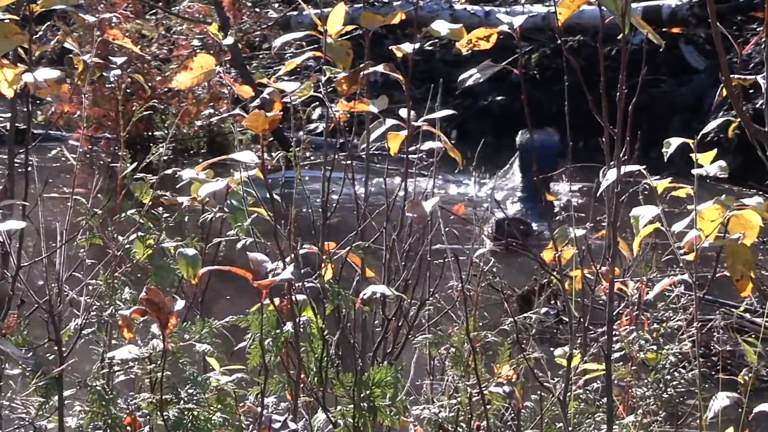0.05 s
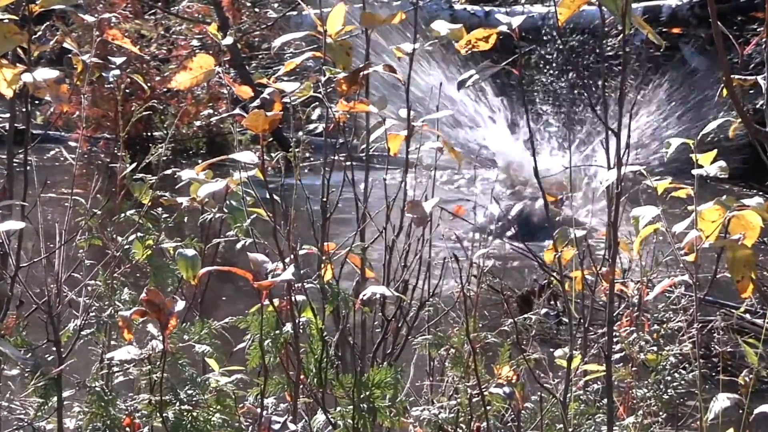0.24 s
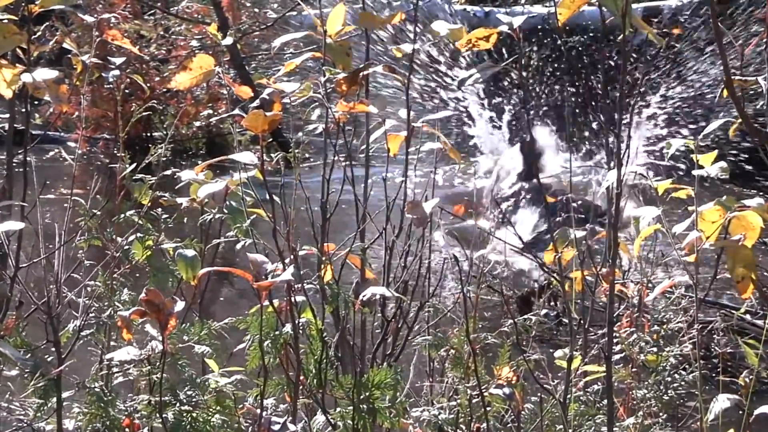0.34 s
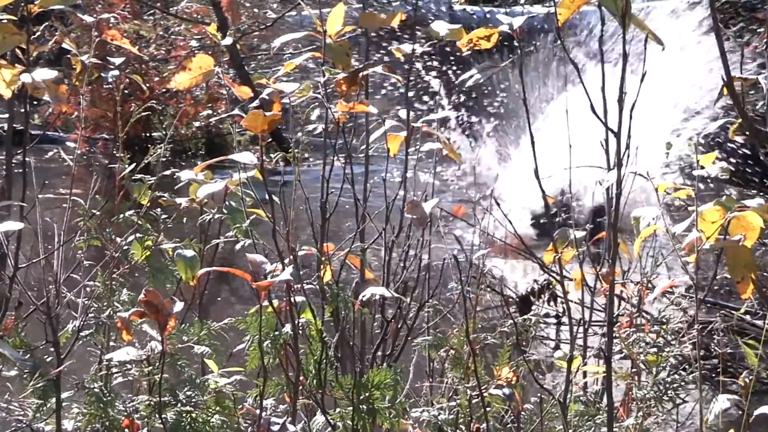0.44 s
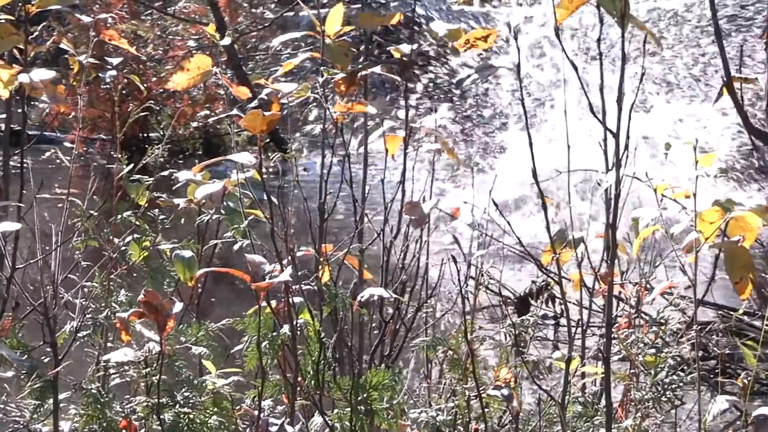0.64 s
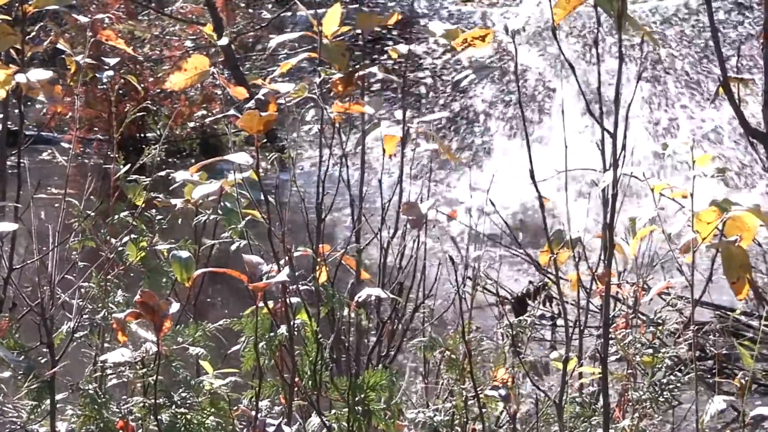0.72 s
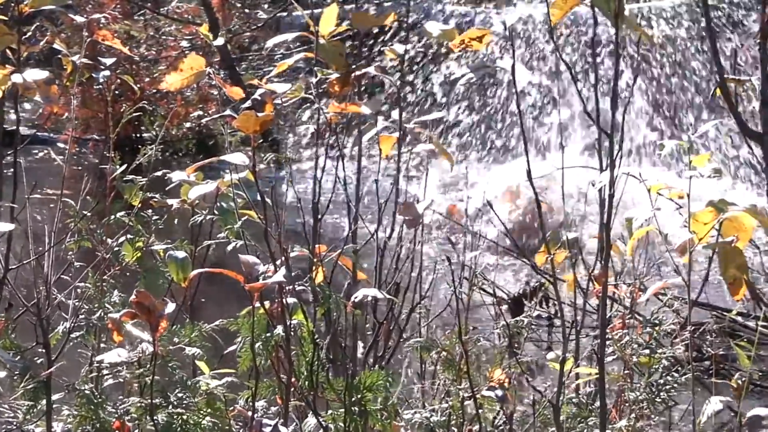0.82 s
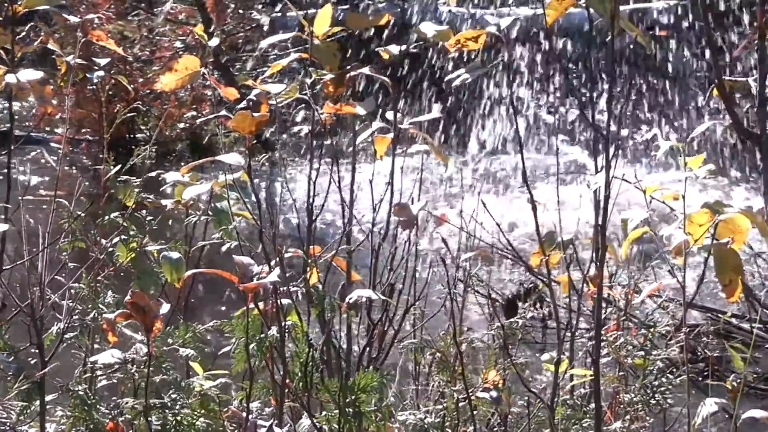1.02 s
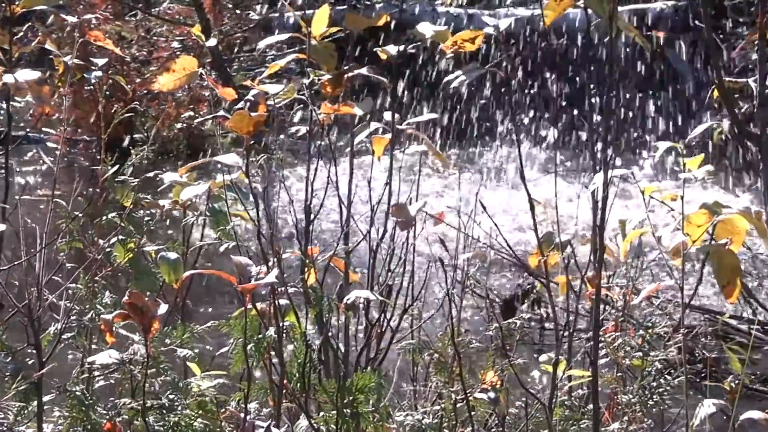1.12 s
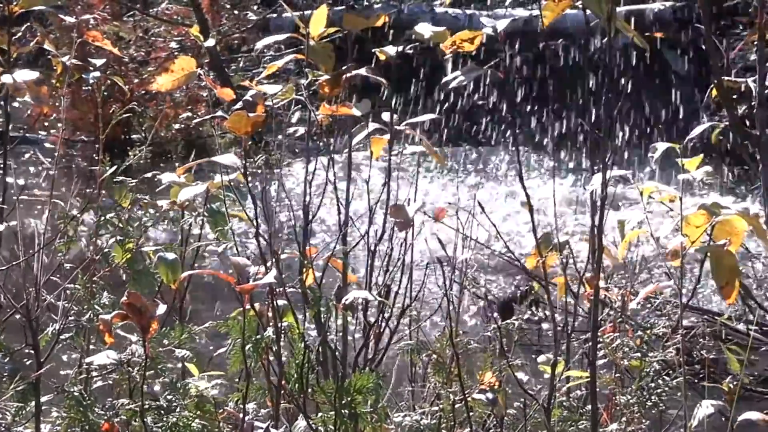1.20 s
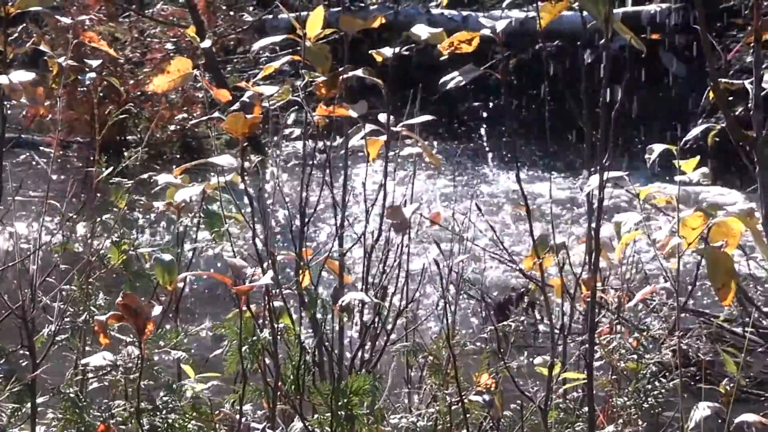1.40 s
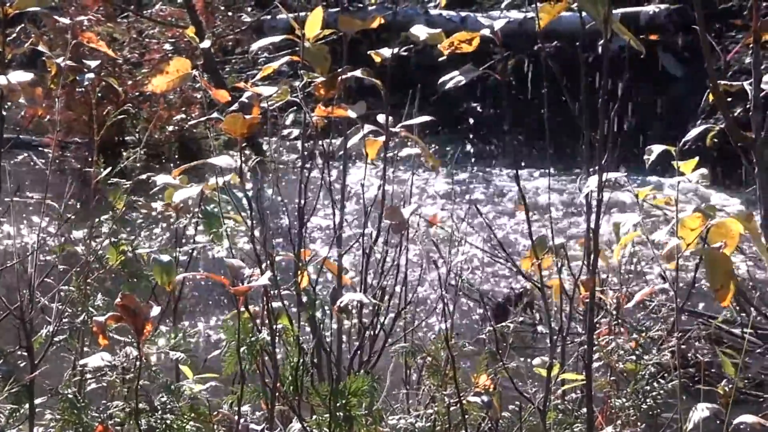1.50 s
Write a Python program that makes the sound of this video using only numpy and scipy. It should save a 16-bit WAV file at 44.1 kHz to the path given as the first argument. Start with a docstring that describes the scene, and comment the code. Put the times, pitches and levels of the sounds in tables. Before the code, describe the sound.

One loud, sharp slap of a beaver's tail on water throws up hissing spray. The water closes with a gulp, splashes down in lumps and trails off in pattering drops and bubbles, heard outdoors from beside a quiet pond.

```python
"""A quiet pond, heard from the bank through brush: a beaver slaps the water with its tail.
The crack throws up a hissing sheet of spray; the hollow it leaves closes with a deep gulp,
then the thrown water falls back, first in lumps, then as a thinning patter of drops.
Bubbles ring as short gliding tones, and running water murmurs faintly far away."""
import sys
import numpy as np
from scipy import signal
from scipy.fft import rfft, irfft, next_fast_len
from scipy.io import wavfile

SR = 44100
rng = np.random.default_rng(int(sys.argv[2]) if len(sys.argv) > 2 else 0)


def to_wav(s):
    """Save 16-bit WAV."""
    ch = np.atleast_2d(s).T  # columns
    pcm = np.round(np.clip(ch, -1, 1) * 32767)  # PCM
    wavfile.write(sys.argv[1], SR, pcm.astype(np.int16))


N = 68355
TIME = np.arange(N) / SR


def from_db(db):
    """Turn decibels into a number to multiply a sound by."""
    return 10 ** (np.asarray(db) / 20)


def unit_power(x):
    """Scale a sound so that its average power is 1."""
    return x / np.sqrt(np.mean(x ** 2) + 1e-20)


def in_time(rows):
    """Join rows of (time, values...) with straight lines: one curve for each value column."""
    times, *columns = np.transpose(rows)
    return [np.interp(TIME, times, column) for column in columns]


def equalise(x, points, skirt_db=0):
    """Filter by a curve of (f/Hz, gain/dB) that falls by skirt_db an octave beyond its ends."""
    hz, db = np.transpose(points)
    size = next_fast_len(2 * N)
    octave = np.log2(np.maximum(np.arange(size // 2 + 1) * SR / size, 1))
    beyond = np.abs(octave - np.clip(octave, np.log2(hz[0]), np.log2(hz[-1])))
    gain = from_db(np.interp(octave, np.log2(hz), db) - skirt_db * beyond)
    return irfft(rfft(x, size) * gain, size)[:N]


def coloured(x, colour):
    """Give a sound its colour (its balance of low and high pitches) and a power of 1."""
    return unit_power(equalise(x, colour, skirt_db=26))


def patter(per_s, spread_db):
    """Tiny impacts of uneven size at random times."""
    sizes = from_db(spread_db * np.minimum(rng.exponential(1, N), 4)) * rng.choice([-1, 1], N)
    return unit_power(sizes * (rng.random(N) < per_s / SR))


def bursts(rows):
    """A loudness curve: each event rises 60 dB to its level, holds, then falls 60 dB per fall time."""
    loudness = np.zeros(N)
    for start, db, rise, hold, fall in rows:
        before = np.maximum(start - TIME, 0) / rise
        after = np.maximum(TIME - start - hold, 0) / fall
        loudness += from_db(db - 60 * (before + after))
    return loudness


def pulse(at_s, db, hz):
    """One quick swing of air pressure, strongest around the pitch hz."""
    offset_squared = (np.pi * hz * (TIME - at_s)) ** 2
    return from_db(db) * (2 * offset_squared - 1) * np.exp(-offset_squared)


def add(out, at_s, sound):
    """Mix a sound into out, starting at the given time."""
    start = int(np.clip(at_s * SR, 0, N - 1))
    out[start:start + len(sound)] += sound[:N - start]


def stream(level_db=-63.5):
    """Running water far away blurs into an even wash of noise."""
    # colour of the murmur: f/Hz, level/dB
    colour = [(25, -21), (70, -7.5), (180, 0), (400, -6.5), (1100, 0), (1800, -10), (2600, -10),
              (6000, -15), (10000, -28), (15000, -35)]
    return from_db(level_db) * coloured(rng.standard_normal(N), colour)


def bubble(hz, octaves_per_s, cycles, swell_cycles=1.06):
    """A bubble rings: its tone swells, glides an octave at most and fades 60 dB over its cycles."""
    t = np.arange(int(cycles / hz * SR) + 2) / SR
    swell = 1 - np.exp(-(t * hz / swell_cycles) ** 2)
    loudness = swell * from_db(-60 * t * hz / cycles)
    pitch = hz * 2 ** np.clip(octaves_per_s * t, -1, 1)
    return loudness / loudness.max() * np.sin(2 * np.pi * np.cumsum(pitch) / SR)


def bubble_cloud(colour, per_s, spread_db, cycles, rise_octaves):
    """Many bubbles born at random times and pitches, each rising as it rings."""
    out = np.zeros(N)
    low, high = colour[0][0], colour[-1][0]
    draws = np.random.default_rng(rng.integers(2 ** 32)).random((int(per_s * N / SR), 5))
    for when, pitch, size, rise, sign in draws:
        hz = low * (high / low) ** pitch
        size_db = spread_db * min(-np.log(1 - size), 3)  # many small, a few large
        gain = hz * from_db(size_db) * np.sign(sign - .5)
        add(out, when * N / SR, gain * bubble(hz, rise * rise_octaves * hz / cycles, cycles))
    return coloured(out, colour)


def falling_water():
    """Lumps of water plunge in, bubbles ring, and fine drops tick and fizz."""
    # colour of the lumps, bubbles and drops: f/Hz, level/dB
    lump_colour = [(90, -30), (140, -11), (220, -1), (330, -1.5), (450, 2), (700, -1)]
    bubble_colour = [(250, -22), (430, -3), (700, -2), (1100, -0.5), (1750, -3), (2400, -14.5),
                     (4000, -10.5)]
    drop_colour = [(1200, 0.5), (2300, -0.5), (3600, -1.5), (6000, -5.5), (9500, -13), (12500, -24),
                   (15500, -37)]
    # how loud each is as time passes: t/s, level/dB
    lump_level = [(.22, -68.5), (.33, -55.5), (.41, -59), (.465, -36), (.55, -38.5), (.64, -42),
                  (.736, -48.5), (.864, -39.5), (.964, -45), (1.0, -40), (1.154, -51), (1.23, -59.5),
                  (1.55, -67)]
    bubble_level = [(0, -70), (.05, -59), (.09, -52), (.15, -56.5), (.22, -63), (.3, -60), (.37, -47),
                    (.42, -41), (.47, -30), (.5, -37.5), (.6, -35.5), (.74, -37), (.82, -35.5), (.89, -33),
                    (.95, -42), (1.04, -34), (1.1, -39), (1.2, -39), (1.34, -47.5), (1.42, -49.5),
                    (1.55, -51)]
    drop_level = [(0, -60.5), (.25, -56), (.37, -50), (.41, -41), (.47, -40), (.51, -42), (.64, -41),
                  (.78, -40.5), (.95, -40.5), (1.05, -39), (1.22, -39.5), (1.33, -44), (1.41, -46),
                  (1.55, -53.5)]
    lumps = bubble_cloud(lump_colour, per_s=600, spread_db=1.0, cycles=8.2, rise_octaves=0.24)
    bubbles = bubble_cloud(bubble_colour, per_s=3000, spread_db=2.0, cycles=17.7, rise_octaves=0.41)
    fizz = bubble_cloud(drop_colour, per_s=2200, spread_db=2.8, cycles=71, rise_octaves=0.11)
    impacts = coloured(patter(per_s=6000, spread_db=1.5), drop_colour)
    drops = unit_power(impacts + from_db(-2.5) * fizz)
    layers = [(lump_level, lumps), (bubble_level, bubbles), (drop_level, drops)]
    return sum(from_db(in_time(level)[0]) * sound for level, sound in layers)


def plops():
    """Large bubbles ring out one by one above the wash."""
    # single bubbles: t/s, f/Hz, level/dB, glide/(octaves per s), ring length/cycles
    big_bubbles = [(.060, 954, -44.5, 27, 28), (.0655, 1280, -40, 40, 24), (.078, 760, -40, 46, 20),
                   (.079, 1530, -38.5, 19, 44), (0.083, 1270, -38, 44, 30), (.092, 2010, -42.5, 17, 31),
                   (.136, 1760, -47, 66, 26), (.138, 1076, -40, 19, 26), (0.142, 1490, -44, 10, 30),
                   (0.34, 2330, -34, 15, 30), (.349, 458, -41, 40, 25), (.364, 576, -41, 17, 22),
                   (.382, 1023, -29.5, 14, 16), (.402, 1710, -35, 11, 60), (.425, 445, -27.5, 13, 17),
                   (.444, 626, -24, 0, 7.5), (.456, 275, -27, 10, 11), (.464, 1193, -30.5, -7.5, 60),
                   (.52, 660, -24, -24, 8), (.521, 298, -33, -9, 9), (.615, 408, -29.5, -5, 11),
                   (0.635, 4180, -24, 9, 110), (0.771, 1710, -28.5, 30, 24), (.800, 1170, -23, 4, 19),
                   (.840, 685, -26, -15, 23), (.850, 513, -26, -28, 12), (0.863, 330, -35, 2, 10),
                   (.897, 1540, -28.5, 15, 33), (1.044, 1560, -27, 20, 21), (1.125, 1950, -28, 54, 26),
                   (1.129, 3420, -26.5, 58, 43), (1.174, 1140, -32, 22, 25), (1.2362, 1530, -25.5, 127, 21),
                   (1.238, 2700, -28.5, 60, 13), (1.365, 1040, -35, 71, 30), (1.411, 1550, -33, 28, 46),
                   (1.412, 3600, -35, 10, 52), (1.491, 2200, -40.5, 4, 40), (1.498, 1136, -41, -29, 37)]
    out = np.zeros(N)
    for start, hz, db, glide, cycles in big_bubbles:
        add(out, start, from_db(db) * bubble(hz, glide, cycles))
    return out


def flying_spray():
    """The surface rips as the tail comes down and throws up a hissing sheet."""
    # water tearing round the tail, and bursts of spray: t/s, level/dB, rise/s, hold/s, fall/s
    tear_bursts = [(.2478, -20.5, 0.016, 0.0065, 0.021)]
    spray_bursts = [(.078, -56, .03, .015, .1), (.2375, -35.5, 0.0032, 0.011, 0.04),
                    (.254, -34, .02, 0.02, 0.23), (.646, -45, 0.011, .005, 0.068)]
    # colour of each: f/Hz, level/dB
    tear_colour = [(130, -15), (360, -15), (550, -2.5), (720, -10.5), (1050, 1.5), (2000, -3.5),
                   (2450, -12), (3300, -2.5), (4600, -14), (5500, -7.5), (9000, -15.5), (12500, -23),
                   (15500, -42)]
    spray_colour = [(200, -19), (600, 3), (1500, 3), (3500, -0.5), (6000, -5), (10000, -8.5), (13000, -24),
                    (15500, -31)]
    tear = bursts(tear_bursts) * coloured(patter(per_s=20000, spread_db=0.0), tear_colour)
    spray = bursts(spray_bursts) * coloured(patter(per_s=9000, spread_db=2.5), spray_colour)
    return tear + spray


def slap(at_s=.2499, swell_s=0.00086):
    """The flat tail hits the water: one sharp pulse, and the air trapped under it rings."""
    # tones of the trapped air: f/Hz, level/dB, time to fade by 60 dB/s
    air_tones = [(550, -17, 0.036), (1053, -17.5, 0.022), (1610, -16, 0.032), (2140, -19.5, 0.028),
                 (2830, -24, .03), (5400, -43, 0.014), (7180, -34, .025)]
    # so short a blow gives off little bass: f/Hz, gain/dB
    bass_cut = [(100, -10), (300, -8), (480, -0.5), (1000, 0)]
    age = np.maximum(TIME - at_s, 0)
    ringing = sum(from_db(db - 60 * age / fade) * np.cos(2 * np.pi * hz * age)
                  for hz, db, fade in air_tones)
    swell = 1 - np.exp(-(age / swell_s) ** 2)
    return equalise(pulse(at_s, db=-2, hz=1296) - ringing * swell, bass_cut)


def ticks(rise_s=0.0016, hold_s=0.00035, fall_s=0.021):
    """Heavy drops burst on the surface, each a sharp tick of noise."""
    # drops landing: t/s, level/dB
    landings = [(0.3785, -44.5), (0.543, -35), (0.545, -37), (0.777, -41.5), (1.055, -42), (1.181, -52),
                (1.201, -35), (1.235, -36), (1.25, -34), (1.269, -36), (1.2913, -36), (1.318, -41),
                (1.362, -44), (1.372, -38.5), (1.408, -38), (1.434, -42)]
    # colour of a tick: f/Hz, level/dB
    colour = [(2500, -9), (4000, -4), (6000, -1), (8500, -15.5), (12000, -18), (15500, -37)]
    loudness = bursts([(start, db, rise_s, hold_s, fall_s) for start, db in landings])
    return loudness * coloured(rng.standard_normal(N), colour)


def gulp():
    """The big hollow of air sinks in pitch as it deepens and rises as it comes back up."""
    # the hollow pulsing as it closes: t/s, f/Hz, level/dB
    hollow = [(.453, 166, -57), (.463, 150, -30.5), (.474, 89.5, -29), (.49, 83.5, -41.5), (.511, 88, -36),
              (.524, 157, -32.5), (.535, 150, -40.5), (.555, 140, -63)]
    hz, db = in_time(hollow)
    sounding = (TIME > hollow[0][0]) & (TIME < hollow[-1][0])
    return sounding * from_db(db) * np.sin(2 * np.pi * np.cumsum(hz * sounding) / SR)


def smacks():
    """Sheets of thrown water land flat, each as a crowd of tiny impacts."""
    # sheets landing: t/s, level/dB, rise/s, hold/s, fall/s
    landings = [(.462, -35, 0.014, 0.015, .08), (.523, -42, 0.012, 0.0025, 0.054),
                (.6335, -25, 0.0093, 0.003, 0.13)]
    # colour of a smack: f/Hz, level/dB
    colour = [(110, -14), (170, -2), (450, 0.5), (1100, 4), (2000, -2), (2700, -2.5), (4300, -5),
              (5300, -8), (6500, -6), (9000, -14.5), (12500, -26.5), (15500, -46)]
    return bursts(landings) * coloured(patter(per_s=15000, spread_db=1.0), colour)


def pop():
    """One fat drop lands with a dry pop, a single pulse of pressure."""
    # the drop: t/s, level/dB, f/Hz
    fat_drop = (.8018, -16, 1230)
    return pulse(*fat_drop)


def scattered_water():
    """The water that lands all over the surface, with fresh random detail on each call."""
    return smacks() + ticks() + falling_water()


def scene():
    """Slap, gulp, plops and pop come from one spot; the rest is spread between left and right."""
    # the splash carries no deep bass: f/Hz, gain/dB
    bass_cut = [(35, -26), (50, -11), (68, -1), (85, 0.5), (1000, 1)]
    # how wide each spread-out source sounds: f/Hz, side compared with middle/dB
    water_width = [(40, -16), (100, -27), (200, -32), (450, -18), (1200, -29.5), (2000, -15), (3300, -12),
                   (6000, -17), (9000, -18), (14000, -24)]
    spray_width = [(100, -22), (400, -19), (1300, -12), (2400, -5), (8000, -7), (14000, -15)]
    stream_width = [(40, -12), (200, -10.5), (1000, 6), (3000, 5), (7000, 3), (12000, -16)]
    # the treble leans a little to the right: f/Hz, left minus right/dB
    lean = [(100, -0.5), (1500, 0.5), (3000, -1), (5500, -2), (10000, -0.4)]
    one_spot = equalise(slap() + gulp() + plops() + pop(), bass_cut)
    middle = one_spot + flying_spray() + scattered_water() + stream()
    # the side sound is added for the left ear and taken away for the right
    side = equalise(scattered_water(), water_width)
    side += equalise(flying_spray(), spray_width)
    side += equalise(stream(), stream_width)
    left = equalise(middle + side, [(hz, db / 2) for hz, db in lean])
    right = equalise(middle - side, [(hz, -db / 2) for hz, db in lean])
    return np.array([left, right])


def record(dry):
    """Cut away the very highest treble with a steep filter."""
    cutoff_hz = 15700
    return signal.sosfiltfilt(signal.butter(12, cutoff_hz, fs=SR, output="sos"), dry)


dry = scene()
out = record(dry)
to_wav(out)
```